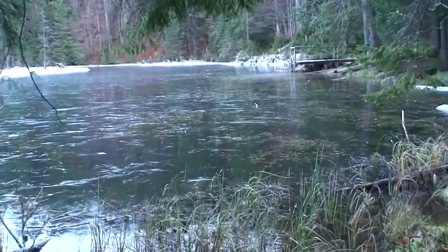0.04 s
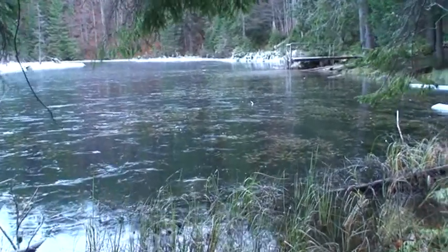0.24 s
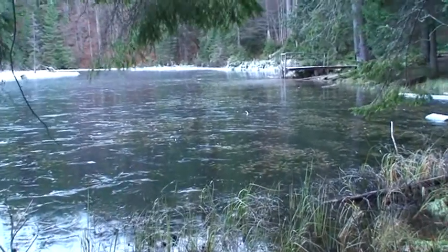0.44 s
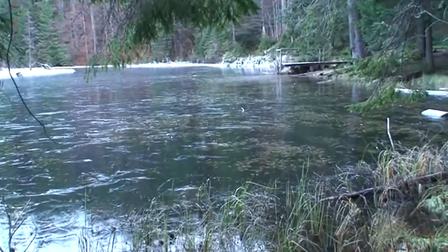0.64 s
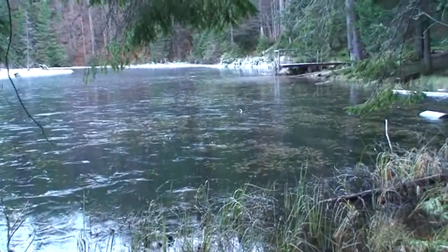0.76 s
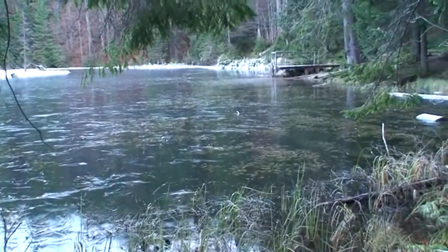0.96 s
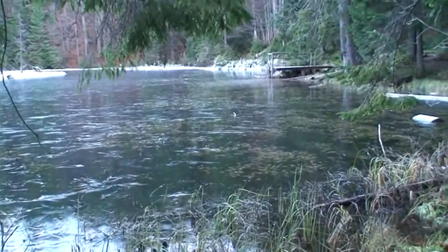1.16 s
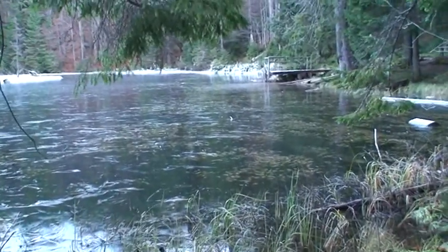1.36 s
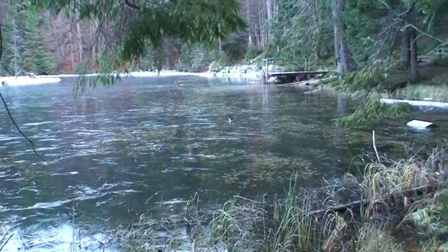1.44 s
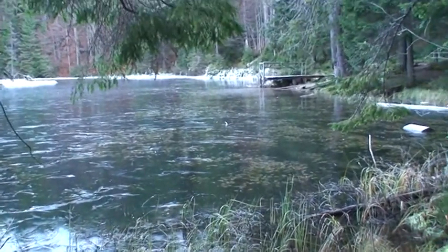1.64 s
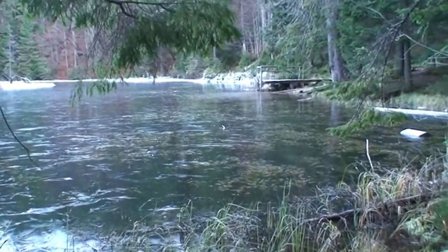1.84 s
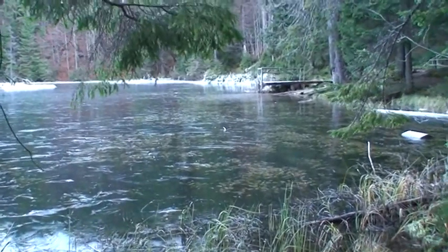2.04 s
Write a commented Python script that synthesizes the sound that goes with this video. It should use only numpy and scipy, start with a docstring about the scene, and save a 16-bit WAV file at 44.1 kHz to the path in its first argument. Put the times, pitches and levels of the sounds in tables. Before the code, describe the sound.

A stone knocks on thin lake ice over faint outdoor air. At about 0.25 seconds comes a quick cluster of sharp cracks and hollow thuds, then two dull bumps. Near 0.9 seconds a lighter knock brings short falling pings. A sliding hiss peaks around 1.3 seconds and ebbs before a last knock at 1.5. Pings and small ticks thin out while wind softly buffets the microphone twice.

```python
"""A stone knocks on the thin ice of a forest lake, over faint outdoor air. At 0.25 s comes a quick cluster:
sharp cracks over hollow thuds, each with a short spray of hiss, then a low wash and two dull bumps.
Near 0.93 s a lighter knock sounds with falling pings, bending waves in the sheet. A swishing hiss
swells to a peak at 1.27 s and ebbs before the last knock at 1.48 s. Pings and small ticks thin out
while wind buffets the microphone twice."""
import sys
import numpy as np
from scipy import signal
from scipy.fft import rfft, irfft
from scipy.io import wavfile

SR = 44100
rng = np.random.default_rng(int(sys.argv[2]) if len(sys.argv) > 2 else 0)


def bounce(signal):
    """Save signal as a 16-bit WAV file at the path given by the first command-line argument."""
    frames = np.transpose(np.atleast_2d(signal))
    limited = np.clip(frames, -1, 1)
    pcm = np.round(limited * 32767).astype(np.int16)
    wavfile.write(sys.argv[1], SR, pcm)


N = 92610  # 2.1 s
HISS_SIDE, DIFFUSE_SIDE = 0.057, 0.55  # side/mid amplitude


def undb(db):
    """Decibels to gain."""
    return 10 ** (np.asarray(db) / 20)


def curve(points):
    """Gain over time from (t/s, level/dB) points."""
    return undb(np.interp(np.arange(N) / SR, *np.array(points).T))


def since(start_s):
    """Seconds since the start, zero before."""
    return np.maximum(np.arange(N) / SR - start_s, 0)


def envelope(start_s, rise_s, decay_s):
    """Exponential rise and fall."""
    t = since(start_s)
    return (1 - np.exp(-t / rise_s)) * np.exp(-t / decay_s)


def band(x, hz, spread):
    """Band-pass from hz / spread to hz * spread."""
    edges_hz = [hz / spread, min(hz * spread, SR / 2 - 1000)]
    return signal.sosfilt(signal.butter(2, edges_hz, "band", fs=SR, output="sos"), x)


def pan(x, db):
    """Stereo placement by L-R level."""
    return x * undb(np.array([[db], [-db]]) / 2)


def noise(spectrum):
    """Unit-rms noise coloured by (f/Hz, level/dB) points."""
    hz, db = np.array(spectrum).T
    f = np.maximum(np.arange(N // 2 + 1) * SR / N, 1)
    colour = undb(np.interp(np.log(f), np.log(hz), db))
    low_cut = np.minimum(f / hz[0], 1)
    y = irfft(rfft(rng.standard_normal(N)) * colour * low_cut, N)
    return y / y.std()


def stereo_noise(spectrum, side):
    """Coloured mid noise plus a share of side noise."""
    return noise(spectrum) + side * noise(spectrum) * np.array([[1], [-1]])


def echo(x, spectrum, rise_s, decay_s, db):
    """Diffuse reflections: convolution with a decaying noise tail."""
    tail = stereo_noise(spectrum, DIFFUSE_SIDE) * envelope(0, rise_s, decay_s)
    tail /= np.sqrt(np.sum(tail ** 2) / 2)
    return undb(db) * signal.fftconvolve(x, tail, axes=1)[:, :N]


def contact(start_s, length_s):
    """Contact of about unit energy: a spike when brief, partly whitened grit when longer."""
    burst = rfft(rng.standard_normal(N) * envelope(start_s, length_s / 2, length_s))
    grit = irfft(burst / np.sqrt(abs(burst) + 0.5 * abs(burst).mean()), N)
    grit /= np.sqrt(np.sum(grit ** 2))
    spike = signal.unit_impulse(N, int((start_s + length_s) * SR))
    spike_share = np.exp(-length_s / 0.00028)
    return np.sqrt(1 - spike_share) * grit + np.sqrt(spike_share) * spike


# air spectrum: f/Hz, level/dB
AIR_SPECTRUM = [(60, -2), (110, 5), (180, 0.5), (350, 5), (1100, 4), (2200, -5), (4500, -15), (8000, -20),
                (10000, -22), (12500, -15), (16000, -34)]

def air(db=-61):
    """Steady, diffuse outdoor air."""
    return undb(db) * stereo_noise(AIR_SPECTRUM, DIFFUSE_SIDE)


# wind envelope: t/s, level/dB
WIND_GUSTS = [(0, -75), (.2, -62.5), (.4, -69.5), (1.5, -67.5), (1.66, -54), (1.82, -65.5), (1.93, -70),
              (2.02, -51.5), (2.1, -57)]

def wind():
    """Low buffeting on the microphone, partly different in each channel."""
    mid, side = band(rng.standard_normal((2, N)), hz=26.2, spread=1.48)
    rumble = mid + side * np.array([[1], [-1]])
    return rumble / rumble.std() * curve(WIND_GUSTS)


# shore echo spectrum: f/Hz, level/dB
SHORE_SPECTRUM = [(60, 15.5), (200, -2), (500, -4.5), (1400, -11.5), (4000, -34), (16000, -14)]

def bank_echoes(x):
    """Long, dark echo from the shore plus short, bright scatter from the near bank."""
    shore = echo(x, SHORE_SPECTRUM, rise_s=0.0067, decay_s=0.3, db=-26.5)
    near_bank = echo(x, SPRAY_SPECTRUM, SPRAY_RISE_S, decay_s=0.013, db=-13)
    return shore + near_bank


def low_wash(db=-48):
    """Dull noise lingering after the first knocks."""
    wash = band(rng.standard_normal(N), hz=236, spread=1.96)
    return undb(db) * wash / wash.std() * envelope(start_s=0.19, rise_s=0.07, decay_s=0.21)


# swish envelope: t/s, level/dB
SWISH_SWELLS = [(0, -53.5), (.1, -52), (.23, -46.5), (.31, -50), (.38, -52.5), (.45, -49), (.52, -55),
                (.58, -60), (.76, -60), (.9, -55), (.97, -46), (1.02, -50.5), (1.14, -45.5), (1.245, -40),
                (1.275, -37.5), (1.335, -47), (1.44, -54.5), (1.6, -58), (1.8, -62.5), (2.1, -66.5)]
# swish spectrum: f/Hz, level/dB
SWISH_SPECTRUM = [(60, -31), (200, 0), (600, 3), (1300, 4.5), (2500, 3.5), (4500, 1), (7500, 0.5),
                  (10000, -6), (12500, -5), (16000, -14)]

def swish(grain_db=2, grains_per_s=600):
    """Fine-grained hiss, as of something sliding, that swells and ebbs."""
    grain_index = np.arange(N) / SR * grains_per_s
    grain = undb(grain_db * np.interp(grain_index, np.arange(N), rng.standard_normal(N)))
    return stereo_noise(SWISH_SPECTRUM, HISS_SIDE) * grain * curve(SWISH_SWELLS)


# low contacts: t/s, level/dB, f/Hz, length/s
BUMP_EVENTS = [(0.425, -14, 222, 0.01), (0.524, -9.5, 138, .02)]

def bumps():
    """Soft, dull contacts."""
    return sum(undb(db) * band(contact(start_s, length_s), hz, spread=1.5)
               for start_s, db, hz, length_s in BUMP_EVENTS)


# small contacts: t/s, level/dB, f/Hz, length/s
TICK_EVENTS = [(.008, -17, 2420, 0.0021), (.0395, -33, 3450, 0.0028), (0.091, -34, 4000, 0.0017),
               (0.5035, -20.5, 5240, .0007), (0.916, -16, 7000, .004), (0.931, -2, 6500, 0.0036),
               (1.264, -0.5, 4300, 0.0012), (1.273, -2, 5300, 0.009), (1.343, -16.5, 4970, 0.00089),
               (1.403, -33, 4460, .0005), (1.4662, -9, 4570, 0.0053), (1.548, -19.5, 2970, 0.0025),
               (1.561, -27, 5000, 0.0017), (1.5749, -17, 3360, 0.0026), (1.577, -20.5, 9700, 0.0037),
               (1.607, -18, 3030, 0.0017), (1.6613, -15, 2530, 0.00098), (1.6614, -27, 6860, 0.00082),
               (1.7022, -15.5, 5160, 0.0025), (1.902, -29, 4900, 0.0023), (1.9237, -21, 4460, 0.004),
               (1.9728, -33, 9000, 0.00069), (2.024, -28, 5000, 0.00095), (2.051, -26.5, 4870, 0.0057)]

def ticks():
    """Light, bright contacts."""
    return sum(undb(db) * band(contact(start_s, length_s), hz, spread=1.516)
               for start_s, db, hz, length_s in TICK_EVENTS)


# sheet pings: t/s, level/dB, first f/Hz, last f/Hz, rise/s, decay/s, pan L-R/dB
PING_EVENTS = [(0.9252, -29, 3280, 2270, 0.0014, 0.004, -5.5),
               (0.9276, -23.5, 2140, 1495, 0.00067, 0.0093, -4.5),
               (0.93, -29.5, 1565, 1220, .002, 0.007, -4.5), (0.9305, -26.5, 1960, 1870, .002, 0.0041, -5),
               (1.255, -35, 1440, 1330, 0.0025, 0.0042, -3), (1.372, -46.5, 1370, 1270, 0.0033, 0.0053, -6),
               (1.4925, -36.5, 1370, 1240, 0.0014, 0.004, -2.5),
               (1.61, -36, 1315, 1225, 0.0025, 0.0055, -3.5), (1.750, -51.5, 1410, 1280, 0.002, .008, -2)]

def pings(glide_s=0.0031):
    """Bending waves in the ice: highs arrive first, so the pitch falls, settles and rings on."""
    out = np.zeros((2, N))
    for start_s, db, first_hz, last_hz, rise_s, decay_s, pan_db in PING_EVENTS:
        t = since(start_s)
        hz = last_hz + (first_hz - last_hz) * np.exp(-t / glide_s)
        chirp = np.sin(2 * np.pi * np.cumsum(hz * (t > 0)) / SR)
        shape = envelope(start_s, rise_s, decay_s) * np.minimum(t / rise_s, 1)
        out += pan(undb(db) * shape / shape.max() * chirp, pan_db)
    return out + echo(out, SPRAY_SPECTRUM, SPRAY_RISE_S, decay_s=0.031, db=-13.5)


def ice_mirror(x, delay_s=0.0022, db=-23.5):
    """Direct sound plus its reflection off the flat ice."""
    return x + undb(db) * np.roll(x, int(delay_s * SR), axis=-1)


# stone resonances: f/Hz, level/dB, decay/s
STONE_MODES = [(3230, -46, 0.0032), (4420, -35.5, 0.0024), (6000, -49, 0.0027), (6630, -57, 0.0035),
               (7460, -43, 0.0033)]

def stone_ring(x):
    """A contact plus the stone's very short, glassy ring."""
    t = since(0)
    ring = sum(undb(db) * np.exp(-t / decay_s) * np.sin(2 * np.pi * hz * t)
               for hz, db, decay_s in STONE_MODES)
    return x + signal.fftconvolve(x, ring)[:N]


SPRAY_RISE_S = 0.0018
# spectrum of the spray, ping tails and near-bank scatter: f/Hz, level/dB
SPRAY_SPECTRUM = [(100, 0.5), (300, -4.5), (1000, -1), (2500, -4), (4000, -1), (7000, 2), (9500, -3.5),
                  (12500, 4), (16000, -4)]
# blows: t/s, thud level/dB, thud f/Hz, boom level/dB, crack level/dB, crack f/Hz,
# crack spread/ratio, contact length/s, pan L-R/dB, spray cutoff/Hz, spray level/dB
KNOCK_EVENTS = [(0.2452, 12.5, 740, 9.5, 6, 4070, 2.48, 0.00039, -2, 13000, -34.5),
                (0.2653, 12, 563, -1, 3.5, 6700, 1.7, 0.00098, -2, 15000, -34.5),
                (0.27, -15, 580, -17, -13, 3000, 1.3, 0.00079, -6, 12000, -66),
                (0.285, 2.5, 900, 3.5, -36, 2980, 1.5, .001, -3, 12000, -68),
                (0.2882, 4, 810, -16, -37, 3000, 1.4, 0.0009, -1, 12000, -68),
                (0.9357, 0, 640, -27, 2.5, 7070, 1.33, 0.000111, -5.5, 9100, -36.5),
                (1.4767, 13.5, 850, 11, -4, 3000, 1.52, .0004, -2, 12900, -38.5)]

def knocks():
    """Each blow pushes the sheet (thud, lower boom), cracks at the contact and trails a short hiss."""
    out = np.zeros((2, N))
    hiss = stereo_noise(SPRAY_SPECTRUM, HISS_SIDE)
    for (start_s, thud_db, thud_hz, boom_db, crack_db, crack_hz,
         crack_spread, length_s, pan_db, cutoff_hz, spray_db) in KNOCK_EVENTS:
        push = signal.unit_impulse(N, int(start_s * SR))
        thud = undb(thud_db) * band(push, thud_hz, spread=1.383)
        boom = undb(boom_db) * band(push, hz=272, spread=1.49)
        crack = undb(crack_db) * band(stone_ring(contact(start_s, length_s)), crack_hz, crack_spread)
        spray = signal.sosfilt(signal.butter(2, cutoff_hz, fs=SR, output="sos"), hiss)
        spray *= undb(spray_db) * envelope(start_s, SPRAY_RISE_S, decay_s=0.02)
        out += pan(thud - boom + crack + spray, pan_db)
    return out


def scene(pan_db=-2):
    """Hits and their echoes, slightly right, over swish, wash, air and wind."""
    hits = ice_mirror(knocks()) + pings() + pan(ticks() + bumps(), pan_db)
    return hits + bank_echoes(hits) + pan(swish() + low_wash() + air(), pan_db) + wind()


def record(dry):
    """Steep low-pass at 15.9 kHz."""
    return signal.sosfilt(signal.ellip(10, 0.2, 80, 15900, fs=SR, output="sos"), dry)


dry = scene()
out = record(dry)
bounce(out)
```